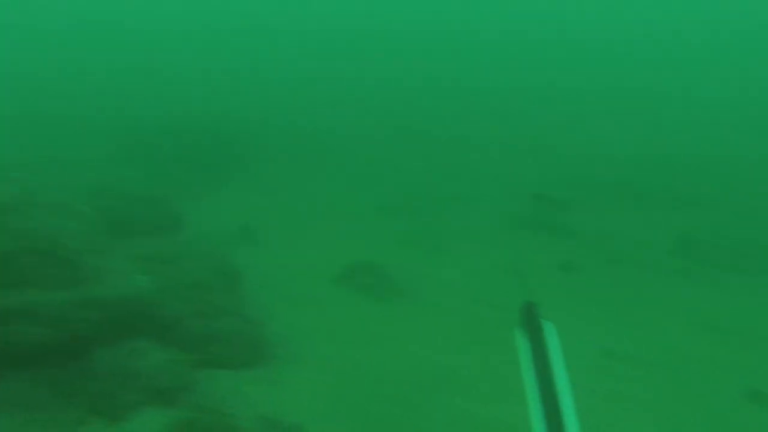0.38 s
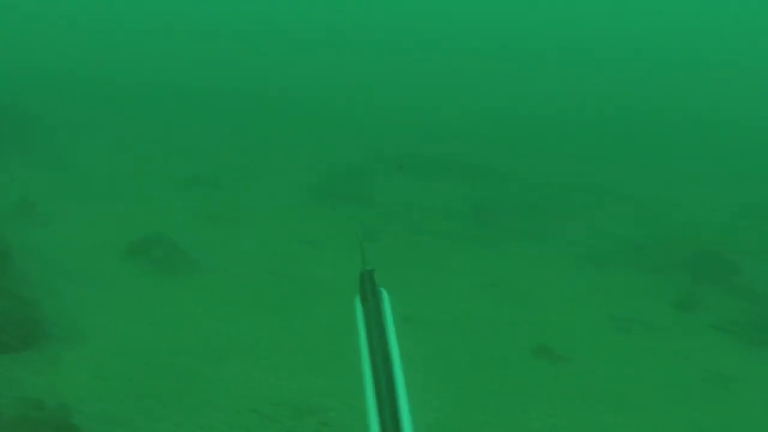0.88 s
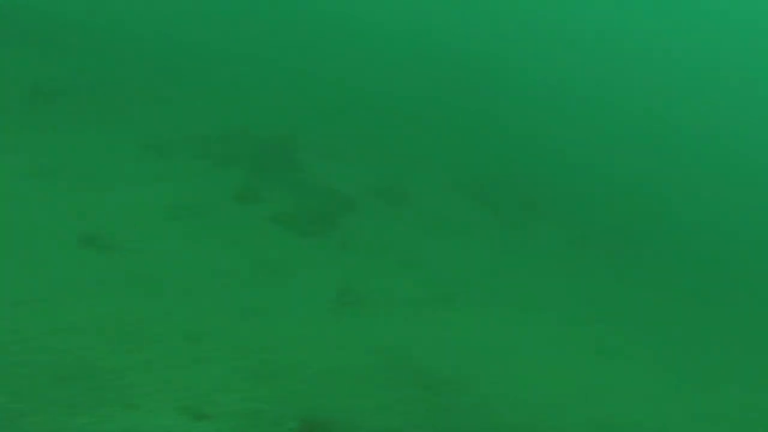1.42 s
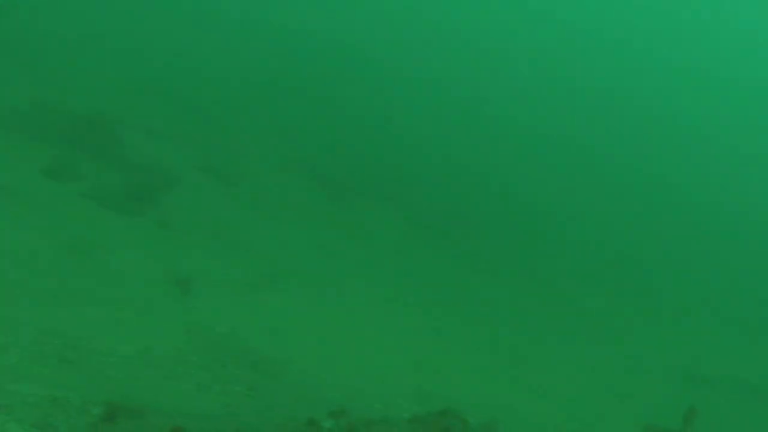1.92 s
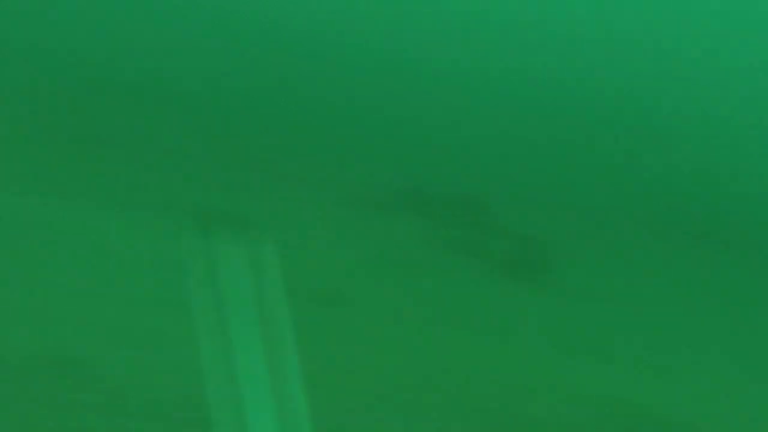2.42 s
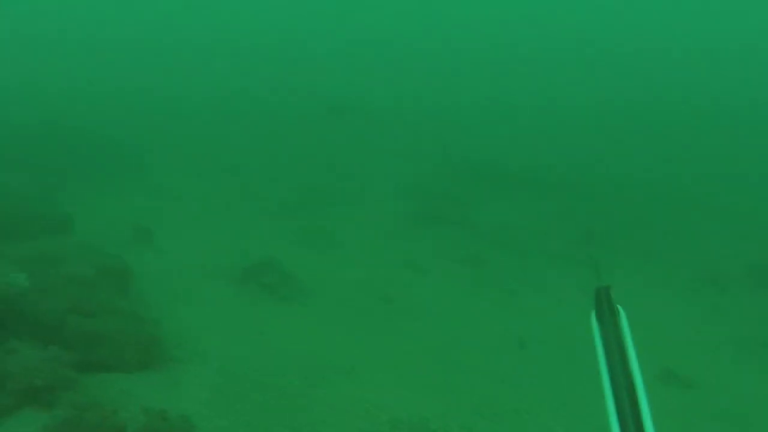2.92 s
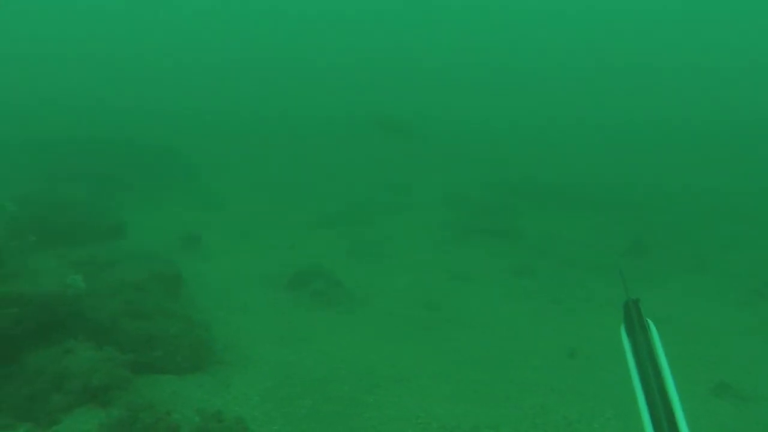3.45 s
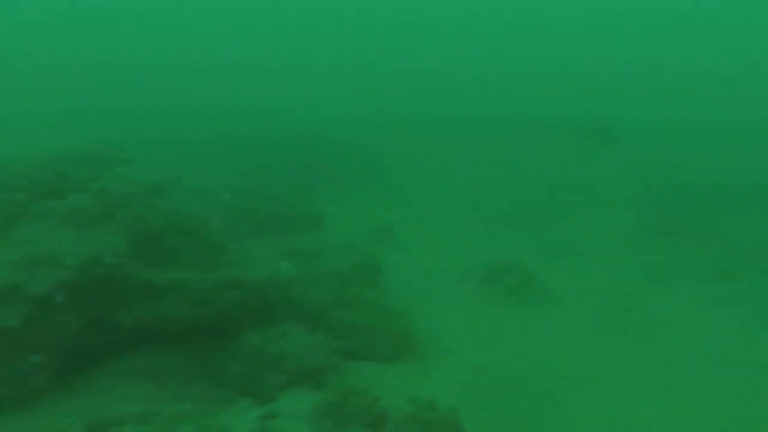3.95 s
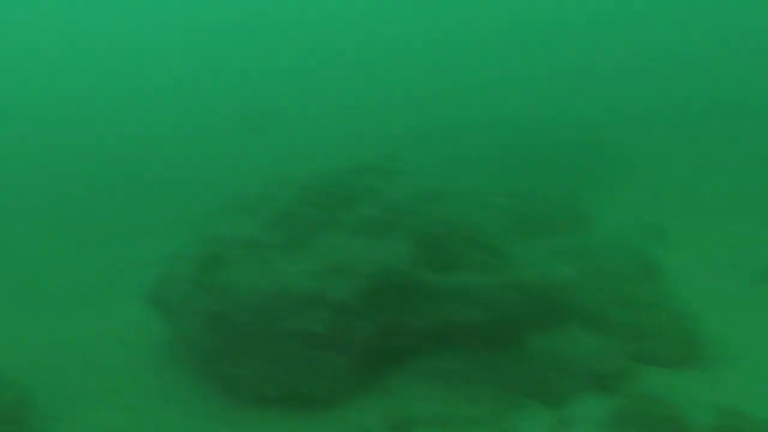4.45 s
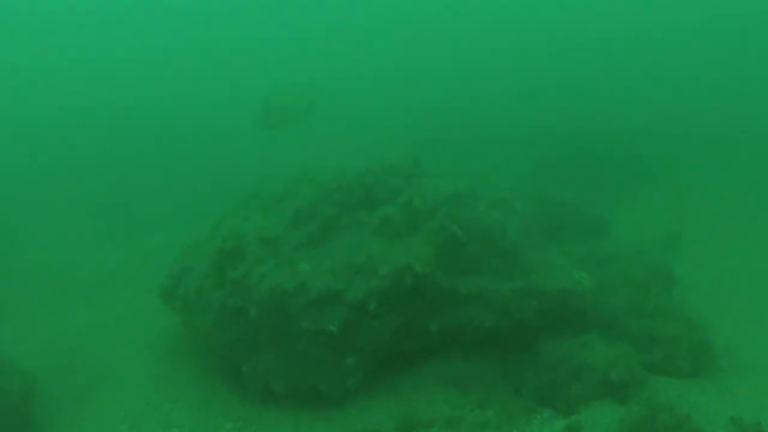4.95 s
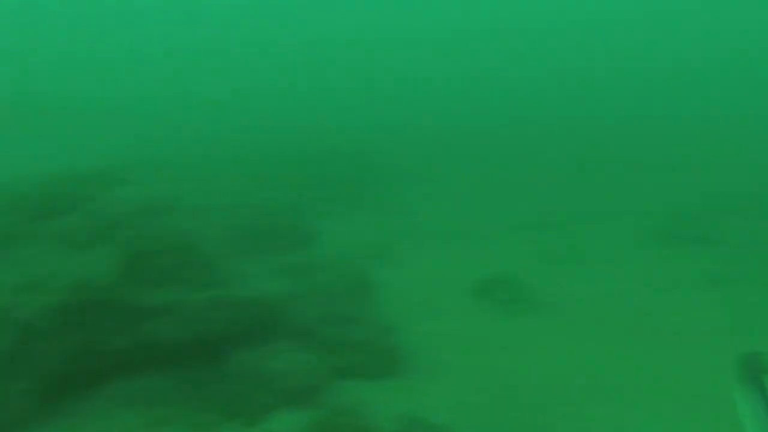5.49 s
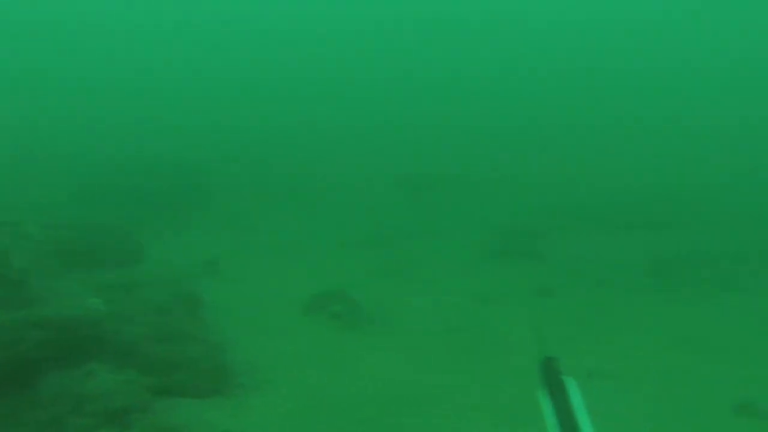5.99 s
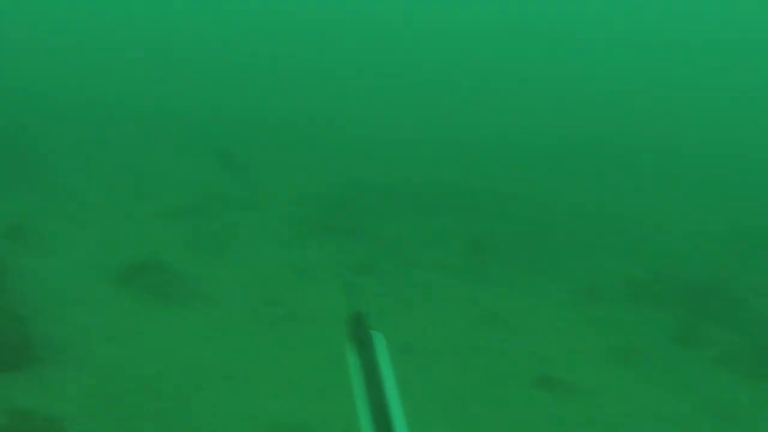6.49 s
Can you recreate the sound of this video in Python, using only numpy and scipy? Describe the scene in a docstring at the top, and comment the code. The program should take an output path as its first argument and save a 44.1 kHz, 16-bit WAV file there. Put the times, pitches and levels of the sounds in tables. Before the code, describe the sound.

Beneath murky sea water, tiny shrimp clicks sputter steadily like quiet frying, broken by a few loud snaps and dull bumps on the microphone housing.

```python
"""Snapping shrimp under water

Shrimp crackle near and far over a rocky bottom, heard by a microphone in a hard housing.
Each click is a sum of decaying housing modes with a short scatter tail; near ones add a diffuse return.
Bumps on the housing are a damped push and a low ring; shaped noise gives surging rumble and steady hiss."""
import sys
import numpy as np
from scipy import signal
from scipy.fft import rfft, irfft
from scipy.io import wavfile

SR = 44100
rng = np.random.default_rng(int(sys.argv[2]) if len(sys.argv) > 2 else 0)


def log_audio(samples):
    """Write samples as a 16-bit WAV file to the path given in sys.argv[1]."""
    # one column per channel
    frames = np.atleast_2d(samples).T
    # limit to full scale, then quantise
    limited = np.clip(frames, -1, 1)
    pcm = np.round(limited * 32767).astype(np.int16)
    wavfile.write(sys.argv[1], SR, pcm)


def ratio(d):
    """dB to gain"""
    e = np.asarray(d, float) / 20
    return 10 ** e


N = 291942  # length in samples

# Near snaps, their surface echoes, and the scrape clicks just before the 4.93 s bump.
# Each row: start in seconds, level in dB ahead of the wall, best-excited pitch in Hz,
# lean in dB (minus to the low modes, plus to the 5 kHz mode), share of the high modes in dB.
NEAR_CLICKS = [(.1349, -37, 3780, 5, -16.5), (.1597, -46, 3360, -13, -16), (.2485, -42.5, 2970, -10, -22),
               (0.3106, -45.5, 2110, -13, -17), (0.5518, -43, 2600, 12, -26), (0.6316, -41, 3360, 12, -5.5),
               (.646, -41.5, 2730, -8, -25), (0.6602, -47.5, 2680, 15, -14), (.8817, -45.5, 8540, 0, -2),
               (.908, -41.5, 3400, -14, -12), (.928, -35, 4400, 5.5, -13), (0.9407, -43.5, 3200, -14, -14),
               (0.9955, -45, 3360, -14, -21), (1.0234, -44, 2450, -8, -4.5), (1.047, -44, 3380, 12, -22),
               (1.367, -46.5, 2540, -12, -13), (1.5307, -44, 2820, 10, -13), (1.5814, -45.5, 3180, -10, -6),
               (1.6571, -44.5, 4220, 11, 0.5), (1.7286, -44.5, 2760, -3, -25), (1.887, -51, 3250, -17, -8),
               (1.8971, -25.5, 4260, 13, -9), (1.9955, -43.5, 3140, 12, -27),
               (2.0525, -48, 2950, -16, -6.5), (2.064, -45.5, 2450, 16, -17), (2.298, -46.5, 4100, 3, -25),
               (2.351, -43.5, 3370, -14.5, -26), (2.461, -47.5, 2560, 22, -20),
               (2.4713, -51.5, 3170, -8, -19), (2.6392, -45.5, 3380, 17, -9.5),
               (2.6652, -45, 2480, -11, -18), (2.7323, -37.5, 3380, -7, -21),
               (2.7898, -46.5, 1380, -18, -11), (3.0769, -41, 2580, -9.5, -25),
               (3.1419, -42.5, 3000, -11, -10), (3.2004, -34.5, 4130, 15, -15.5),
               (3.2158, -42.5, 2700, -7, -18), (3.222, -41.5, 2580, -16, -24), (3.228, -50, 2670, -10, -5),
               (3.268, -33, 3200, 17, -20), (3.3376, -42.5, 4300, 8, -8.5), (3.467, -46, 2760, -12, -21),
               (3.5035, -49, 2560, 18, -6.5), (3.6099, -47, 2550, -12, -24), (3.762, -43.5, 2240, -14, -22),
               (3.7787, -43, 2540, 13.5, -5.5), (3.8238, -45, 3340, 16, -18), (3.8903, -41.5, 2580, -7, -6),
               (3.9085, -38.5, 3340, 7, -10), (4.0455, -43, 2090, -17.5, -21),
               (4.117, -17.5, 3800, -11, -14), (4.136, -31, 2950, -8, -8.5), (4.1567, -37.5, 4030, -3, -18),
               (4.317, -50.5, 2580, 9, -2.5), (4.362, -43.5, 2970, -8, -27), (4.396, -37, 2560, 16.5, -17),
               (4.426, -52, 2760, -6, -10), (4.44, -52, 3300, -8, -19), (4.755, -40.5, 3560, -16.5, -31),
               (4.803, -43, 2800, 12, -10), (4.8825, -47, 3400, -10, -26), (4.9221, -36, 2600, -3, -22),
               (4.925, -40.5, 3300, -1, -11), (4.9268, -37, 2420, -19, -14),
               (4.9286, -33.5, 1450, -16, -20), (5.0211, -34.5, 2660, 15, -11.5),
               (5.1457, -49, 3360, 8, -26), (5.1687, -44.5, 4050, 3, -21), (5.2076, -37.5, 3700, -12, -33),
               (5.2228, -38, 2540, -8, -18), (5.2421, -41, 2990, 11, -19), (5.2586, -37, 4140, 13.5, -20),
               (5.418, -56, 2520, 3, -6), (5.5459, -47, 2720, -15, -19), (5.706, -39.5, 3300, -13, -21),
               (5.7151, -40, 3340, -3, -22), (5.7275, -43, 3450, -14, -23), (5.741, -30, 2650, -5, -23),
               (5.7606, -43, 2990, -11, -16), (5.8742, -40.5, 2860, -1, -33), (6.1707, -46.5, 2970, 11, -8),
               (6.241, -25.5, 3470, -6.5, -17), (6.2575, -33, 3030, 4, -8.5),
               (6.2829, -39.5, 3250, -11, -11), (6.379, -49, 3440, -6, -25), (6.4872, -45, 3300, -9, -6.5),
               (6.558, -57, 2700, 2, -27)]
# Housing modes. Each row: pitch in Hz, level in dB relative to its mode group, t60 in seconds.
HOUSING_MODES = [(1466, -2.5, 0.019), (1670, -10.5, 0.035), (2041, 1.5, 0.022), (2290, -11, 0.039),
                 (2560, 0.5, 0.021), (2760, -5.5, 0.017), (3035, -5, 0.019), (3380, 8, 0.0093),
                 (4075, 5, 0.0095), (4370, 1, 0.0092), (5260, 24, 0.0083), (5886, 9, 0.0067),
                 (7010, -23, 0.0039), (8640, -16, 0.0027), (10800, -11, 0.0017), (12450, -13.5, 0.0016),
                 (14600, -28, 0.0026)]
# Course of the distant crackle. Each row: time in seconds, level in dB without flurries, ahead of the wall.
FAR_BED_LEVELS = [(0.0, -55.5), (1.0, -59.5), (2.3, -61), (3.2, -60.5), (4.4, -58), (5.4, -59),
                  (6.62, -59.5)]
# Bumps on the housing. Each row: start in seconds, push in dB, push pitch in Hz, ring in dB,
# wait before the ring in seconds.
HOUSING_BUMPS = [(3.596, -49, 198, -57.5, 0.015), (4.706, -33, 426, -40.5, 0.011),
                 (4.9294, -20.5, 900, -37, 0.0107), (5.164, -53, 300, -56, 0.007),
                 (5.848, -63, 300, -57.5, 0.0092)]
# Air modes that a bump rings. Each row: pitch in Hz, relative level in dB, t60 in seconds.
CAVITY_MODES = [(146, 4, 0.15), (252, 7.5, 0.057)]
# Spectrum of rumble and microphone hiss. Each row: frequency in Hz, relative density in dB per Hz.
NOISE_SPECTRUM = [(4, -15), (8, 7), (25, -1), (50, -3), (100, -8.5), (300, -15.5), (1000, -20.5),
                  (3000, -18.5), (7000, -30.5), (13000, -35), (16000, -40)]
# Borders between the low, middle, 5 kHz and high mode groups. Each entry: frequency in Hz.
GROUP_BORDERS_HZ = [2350, 4800, 6000]
# Bands the wall passes badly. Each row: centre in Hz, width in Hz.
WALL_NOTCHES = [(1880, 82), (4760, 420), (9700, 130)]

# share of the low and 5 kHz modes without lean; dB lost by the far side per dB of lean
REST_DB, LOSS_DB_PER_DB = -18, 0.19
# extra bed level per near click, and its 1/e fading time
FLURRY_DB, FLURRY_S = 2.5, 0.028
# rms of the hiss; rumble: border, mean level, depth and pace of its surges
HISS_DB = -60
RUMBLE_HZ, RUMBLE_DB, SURGE_DEPTH_DB, SURGE_HZ = 126, -63.5, 1, 13


def decay(t60_s, t_s):
    """Amplitude left after t_s of an exponential decay."""
    return ratio(-60 * t_s / t60_s)


def evened(x):
    """Scales to rms 1."""
    return x / np.sqrt(np.mean(x ** 2) + 1e-20)


def drift(corner_hz):
    """Slow random curve of rms 1: noise that falls off above corner_hz."""
    hz = np.fft.rfftfreq(N, 1 / SR)
    return evened(irfft(rfft(rng.standard_normal(N)) / (1 + (hz / corner_hz) ** 2), N))


def add(mix, start_s, sound):
    """Adds a sound to the mix in place, cut at the end."""
    part = mix[round(start_s * SR):][:len(sound)]
    part += sound[:len(part)]


def click(best_hz, low_db, ping_db, high_db, luck, favour_db, uneven_db, rise_s=0.00045):
    """A shock, for a snap a collapsing bubble, rings the housing; its direction decides which modes answer."""
    hz, db, t60_s = np.array(HOUSING_MODES).T[:, :, None]
    t = np.arange(1400) / SR
    colour, phase, detune = luck[:3 * len(hz)].reshape(3, -1, 1)

    near_best = np.exp(-(np.log(hz / best_hz) / 0.14) ** 2)
    # a bright click reaches the top modes
    tilt_db = 0.4 * (high_db + 3) * np.log2(np.maximum(hz / GROUP_BORDERS_HZ[-1], 1))
    # the high modes are the most directional
    uneven_db = uneven_db + 3.4 * (hz > GROUP_BORDERS_HZ[-1])
    mode_db = db + favour_db * near_best + uneven_db * colour + tilt_db

    tuned_hz = hz * (1 + 0.015 * detune)
    onset = np.tanh((t / rise_s) ** 2)
    rings = ratio(mode_db) * decay(t60_s, t) * onset
    rings = rings * np.sin(2 * np.pi * tuned_hz * (t - rise_s) + 0.55 * phase)
    rings = rings * (1 + 0.4 * np.exp(-t / 0.0007))  # the shock itself

    # the middle modes take the power the others leave
    middle_power = 1 - ratio(2 * low_db) - ratio(2 * ping_db) - ratio(2 * high_db)
    middle = np.sqrt(max(middle_power, 0.05))
    group = np.searchsorted(GROUP_BORDERS_HZ, hz[:, 0])
    sound = 0
    for k, share in enumerate([ratio(low_db), middle, ratio(ping_db), ratio(high_db)]):
        part = rings[group == k].sum(0)
        sound = sound + share * part / np.sqrt(np.mean(part[:220] ** 2))  # rms over 5 ms
    sound = sound / np.sqrt(np.mean(sound[:88] ** 2))  # rms 1 over 2 ms

    # quick reflections from nearby rocks; the cube makes a few stand out
    taps = 0.3 * luck[-200:] ** 3 / 12 * decay(0.0038, t[:200])
    return np.convolve(sound, np.r_[1, taps]) / np.sqrt(1 + np.sum(taps ** 2))


def near_clicks():
    """Near snaps, surface echoes and scrape clicks, most leaning to the low modes or the 5 kHz mode."""
    out = np.zeros(N)
    luck = rng.standard_normal((len(NEAR_CLICKS), 260))
    for (start_s, db, best_hz, lean_db, high_db), row in zip(NEAR_CLICKS, luck):
        low_db = REST_DB + max(-lean_db, -LOSS_DB_PER_DB * lean_db)
        ping_db = REST_DB + max(lean_db, LOSS_DB_PER_DB * lean_db)
        one = click(best_hz, low_db, ping_db, high_db, row, favour_db=11, uneven_db=0)
        add(out, start_s, ratio(db) * one)
    return out


def seabed(x, t60_s=0.38, surface_s=0.014, early_db=-12):
    """Diffuse return: weak from the bottom at first, full once sound is back from the surface."""
    t = np.arange(SR // 5) / SR
    build = np.where(t > surface_s, 1, ratio(early_db)) * (t > 0.003)
    tail = rng.standard_normal(len(t)) * decay(t60_s, t) * build
    return signal.oaconvolve(x, tail / np.linalg.norm(tail))[:N]


def flurries():
    """Extra dB of the far bed: jumps at every near click, then fades."""
    t = np.arange(0, N / SR, 0.002)
    since_s = t[:, None] - np.array(NEAR_CLICKS)[:, 0]
    humps = (np.exp(-abs(since_s) / FLURRY_S) * (since_s > 0)).sum(1)
    return np.interp(np.arange(N) / SR, t, FLURRY_DB * humps)


def far_shrimp(kinds=34, snaps_per_s=300, spread_db=4, top_db=17, clump_db=5.5, blur_db=-7):
    """Small snaps of random colour come in clumps; the farthest merge into a housing-coloured hiss."""
    clumps = drift(23)
    chance = snaps_per_s * ratio(clump_db * clumps) / SR  # snaps_per_s holds where clumps is 0
    size_db = np.minimum(spread_db * rng.exponential(1, N), top_db)
    size = ratio(size_db) * (rng.random(N) < chance)
    blur = rng.standard_normal(N) * ratio(1.8 * clumps)
    kind = rng.integers(0, kinds, N)

    snaps, merged = np.zeros(N), np.zeros(N)
    for k, row in enumerate(rng.standard_normal((kinds, 263))):
        best_hz = HOUSING_MODES[k % len(HOUSING_MODES)][0]
        low_db, ping_db = -8 + 3 * row[0], -11 + 4 * row[1]
        high_db = min(-14 + 4.9 * row[2], -3)
        one = click(best_hz, low_db, ping_db, high_db, row[3:], favour_db=9.5, uneven_db=4.5, rise_s=0.000596)
        snaps += signal.oaconvolve(size * (kind == k), one)[:N]
        merged += signal.oaconvolve(blur * (kind == k), one)[:N]

    bed = evened(snaps) + ratio(blur_db) * evened(merged)
    bed_db = np.interp(np.arange(N) / SR, *np.transpose(FAR_BED_LEVELS))
    return ratio(bed_db + flurries()) * evened(bed)


def wall(x, low_hz=1150):
    """The stiff wall holds back the bass of the crackle and is deaf in a few narrow bands."""
    x = signal.sosfilt(signal.butter(6, low_hz, "high", fs=SR, output="sos"), x)
    for hz, width_hz in WALL_NOTCHES:
        x = signal.lfilter(*signal.iirnotch(hz, hz / width_hz, SR), x)
    return x


def bumps(swell_s=0.0037, hold_s=0.024):
    """A push of about one cycle, then the air in the housing swells into a short low ring."""
    out, t = np.zeros(N), np.arange(SR // 10) / SR
    ring = 0
    for hz, db, t60_s in CAVITY_MODES:
        ring = ring + ratio(db) * decay(t60_s, t) * np.cos(2 * np.pi * hz * (t - swell_s))
    ring = ring * np.tanh((t / swell_s) ** 2) / (1 + (t / hold_s) ** 8)

    for start_s, push_db, push_hz, ring_db, wait_s in HOUSING_BUMPS:
        turns = push_hz * t
        push = -np.sin(2 * np.pi * turns) * np.exp(-1.6 * turns) * np.tanh(3 * turns)
        add(out, start_s, ratio(push_db) * push)
        add(out, start_s + wait_s - swell_s, ratio(ring_db) * ring)
    return out


def rumble_and_hiss():
    """Shaped noise split in two: steady microphone hiss above, surging water rumble below."""
    hz = np.fft.rfftfreq(N, 1 / SR)
    table_hz, table_db = np.transpose(NOISE_SPECTRUM)
    density_db = np.interp(np.log(hz + 1), np.log(table_hz + 1), table_db)
    shaped = rfft(rng.standard_normal(N)) * ratio(density_db)

    low = 1 / (1 + (hz / RUMBLE_HZ) ** 4)
    steady = evened(irfft(shaped * (1 - low), N))
    rumble = evened(irfft(shaped * low, N))
    surge_db = RUMBLE_DB + SURGE_DEPTH_DB * drift(SURGE_HZ)
    return ratio(HISS_DB) * steady + ratio(surge_db) * rumble


def scene():
    """Near clicks and far shrimp through the wall, plus bumps, rumble and hiss; one channel."""
    near = near_clicks()
    wet = near + ratio(-23) * seabed(near)
    crackle = wall(wet + far_shrimp())
    return (crackle + bumps() + rumble_and_hiss())[None]


def low_pass(x):
    """Removes everything above the highest recorded frequency."""
    return signal.sosfilt(signal.butter(12, 16520, fs=SR, output="sos"), x)


def record(dry):
    """Low-pass at the recorder's 15.5 kHz band edge."""
    edge = signal.firwin(61, 15500, fs=SR)
    mix = signal.oaconvolve(dry, edge[None], "same")
    return low_pass(mix)


dry = scene()
out = record(dry)
log_audio(out)
```